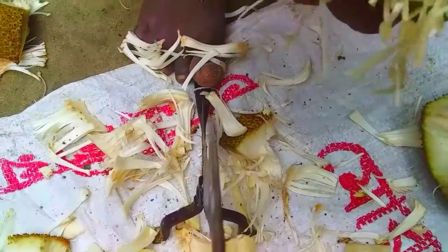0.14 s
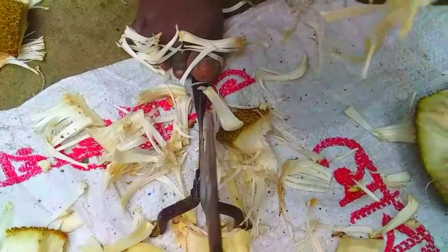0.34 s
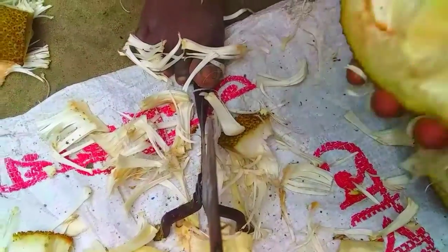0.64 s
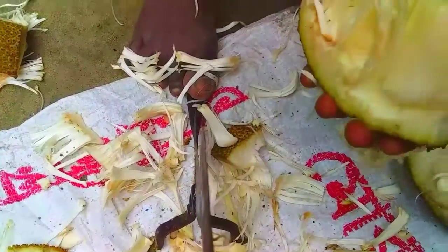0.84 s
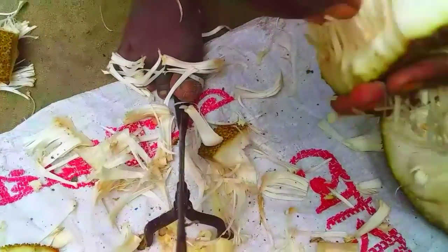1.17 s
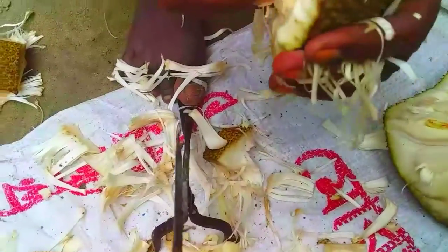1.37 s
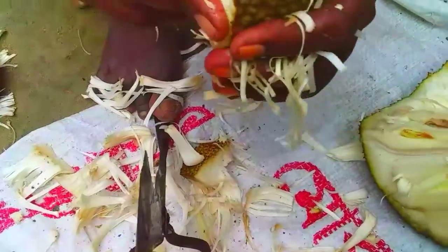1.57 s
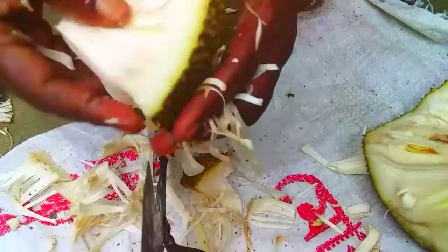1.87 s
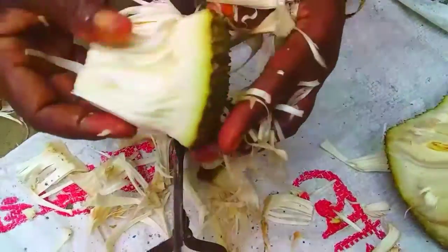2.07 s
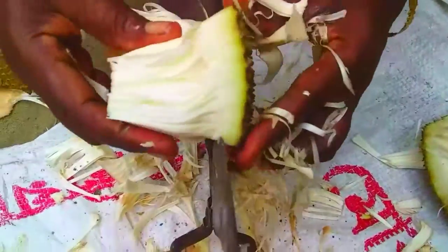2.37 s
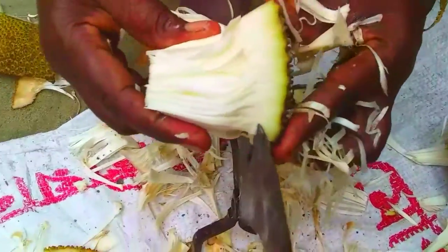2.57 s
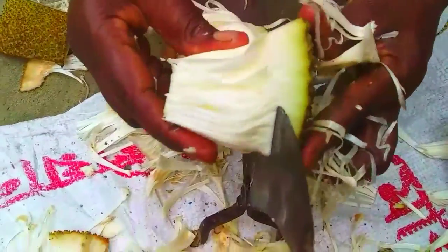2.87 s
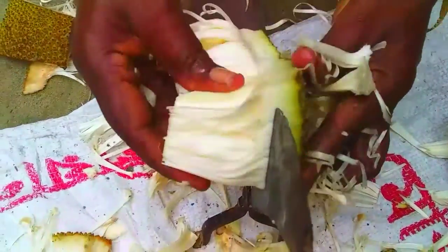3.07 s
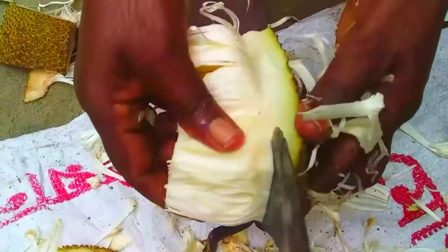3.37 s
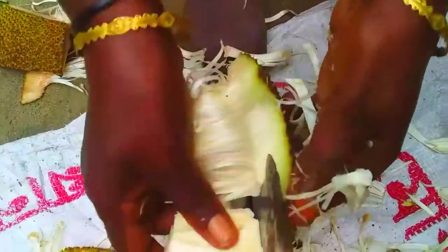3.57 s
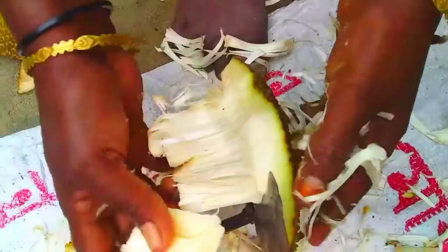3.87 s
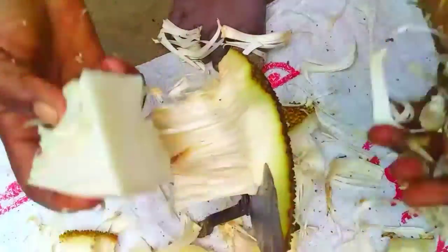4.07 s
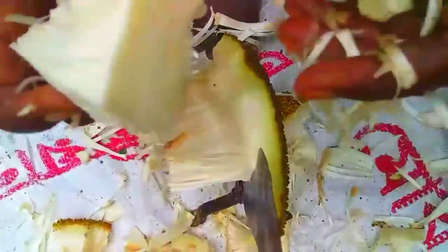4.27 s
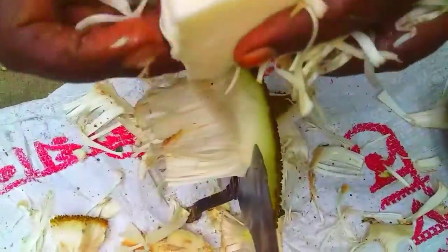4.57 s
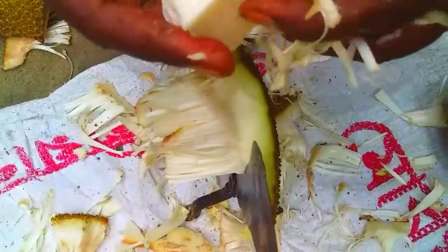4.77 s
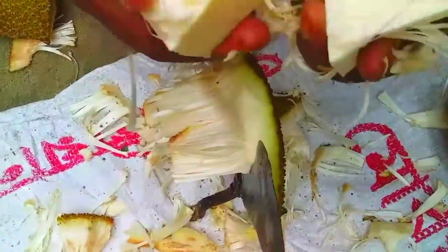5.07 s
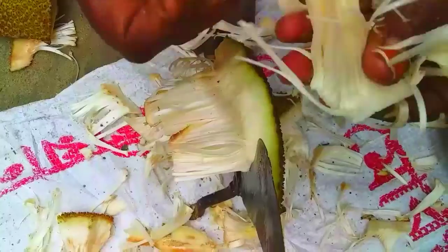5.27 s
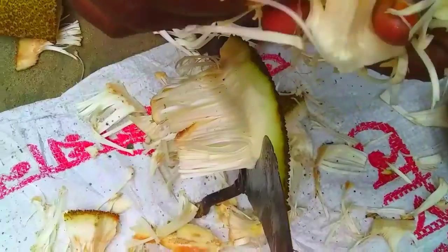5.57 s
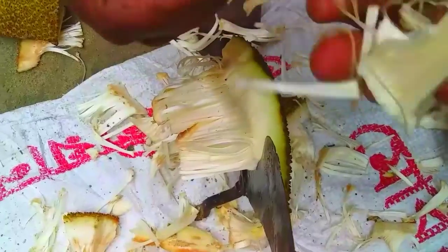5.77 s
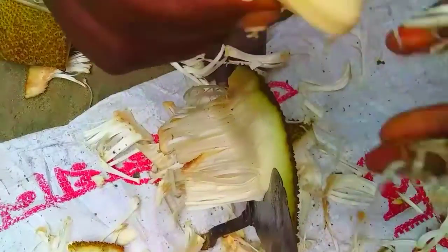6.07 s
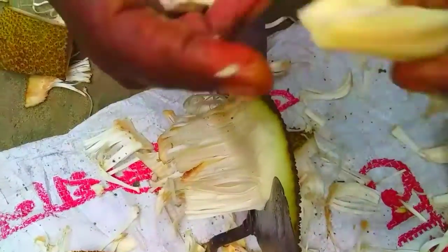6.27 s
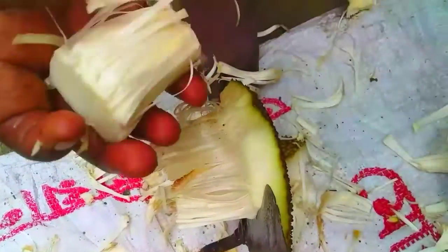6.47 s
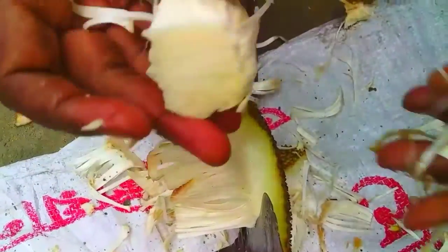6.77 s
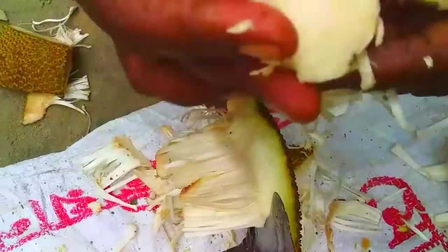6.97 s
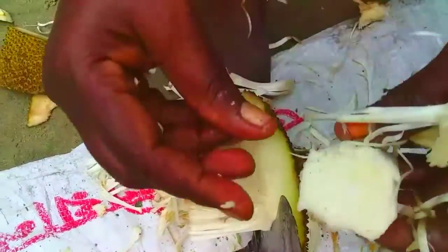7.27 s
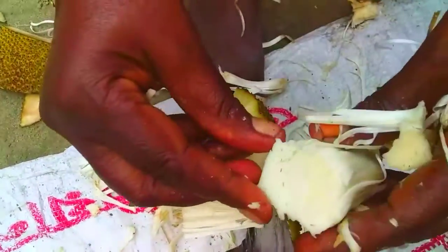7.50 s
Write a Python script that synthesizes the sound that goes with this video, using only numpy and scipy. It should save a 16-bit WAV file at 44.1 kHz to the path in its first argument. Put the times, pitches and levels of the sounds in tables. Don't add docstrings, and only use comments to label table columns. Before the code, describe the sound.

Close hands rip and snap a fibrous jackfruit on a blade while a chick peeps and a kid goat bleats once in a walled yard.

```python
import sys
import numpy as np
from scipy import signal
from scipy.fft import rfft, irfft, next_fast_len
from scipy.io import wavfile
from scipy.ndimage import uniform_filter1d

SR = 44100
rng = np.random.default_rng(int(sys.argv[2]) if len(sys.argv) > 2 else 0)


def rack_gain(trim_db):
    fader = np.asarray(trim_db, float)
    return 10 ** (fader / 20)


def materialize(psi):
    bounded = np.clip(np.atleast_2d(psi).T, -1, 1)
    quanta = np.round(bounded * 32767).astype(np.int16)
    wavfile.write(sys.argv[1], SR, quanta)


N = 336867

# start_s, peak_db
TICKS = [(0.562, -43), (0.7018, -57), (2.4773, -79), (3.2253, -30), (3.64, -42), (3.674, -48),
         (3.686, -40.5), (3.731, -48), (3.763, -41), (4.0234, -41), (4.0996, -58), (4.1428, -41),
         (4.6474, -41), (4.667, -33), (4.7027, -36), (4.835, -40), (4.947, -46), (4.8857, -25.5),
         (5.0506, -36), (5.077, -45), (5.27, -34.5), (5.439, -45), (5.482, -38), (5.5557, -48),
         (5.5867, -33), (6.0604, -34), (6.4502, -47), (6.484, -47), (6.594, -41), (6.746, -40),
         (6.868, -41), (7.0048, -37), (7.482, -35)]
SNAP_ATTACK_S = 0.0022


def rms_one(x):
    return x / np.sqrt(np.mean(x ** 2) + 1e-20)


def in_time(rows):
    s, *columns = np.transpose(rows)
    first, last = round(s[0] * SR), min(round(s[-1] * SR), N)
    t = np.arange(first, last) / SR
    return first, last, [np.interp(t, s, c) for c in columns]


def whole(rows):
    s, *columns = np.transpose(rows)
    return [np.interp(np.arange(N) / SR, s, c) for c in columns]


def drift(rate, size=N):
    r = np.exp(-2 * np.pi * rate / SR)
    noise = rng.standard_normal(size + SR // 2)
    return rms_one(signal.lfilter([1], [1, -2 * r, r * r], noise)[SR // 2:])


def coloured(x, spectrum):
    size = next_fast_len(len(x))
    hz = np.arange(size // 2 + 1) * SR / size + 1
    table_hz, table_db = np.transpose(spectrum)
    gain = rack_gain(np.interp(np.log(hz), np.log(table_hz), table_db))
    return irfft(rfft(x, size) * gain, size)[:len(x)]


def band(x, low_hz, high_hz):
    return signal.sosfilt(signal.butter(2, [low_hz, high_hz], "band", fs=SR, output="sos"), x)


def resonance(x, hz, width):
    r = np.exp(-np.pi * width / SR)
    poles = [1, -2 * r * np.cos(2 * np.pi * hz / SR), r * r]
    return signal.lfilter([(1 - r * r) / 2, 0, (r * r - 1) / 2], poles, x)


def add(out, s, piece):
    at = round(s * SR)
    out[at:at + len(piece)] += piece[:N - at]


def fade(size, rise=.3):
    return signal.windows.tukey(size, np.clip(rise, .01, 1))


def whistle(hz, db):
    return rack_gain(db) * np.sin(2 * np.pi * np.cumsum(hz) / SR)


def glide(start_hz, end_hz, length, db):
    size = round(length * SR)
    return fade(size, 0.26) * whistle(np.linspace(start_hz, end_hz, size), db)


def bleat(rows, waver_db, second_db, throat_scale, rough):
    # freq_hz, level_db
    throat = [(400, -56), (600, -34.5), (1000, -19.5), (1300, -2), (1700, -2.5), (1950, -28), (2250, -16.5),
              (2800, -6.5), (3400, -12.5), (4500, -9), (5600, -13.5), (7800, -22), (9000, -31),
              (11000, -53)]
    first, last, (hz, level_db, tilt_db) = in_time(rows)
    size = last - first
    sag = 1 - hz / hz.max()
    rough = np.clip(rough + 0.8 * sag, 0, 1)
    fray_db = 32 * np.maximum(sag - 0.1, 0)
    hz = uniform_filter1d(hz, size=600, mode="nearest")
    hz = hz * (1 + 0.00092 * drift(34, size) + 0.033 * rough * drift(127, size))
    phase = 2 * np.pi * np.cumsum(hz) / SR
    throat_hz, throat_db = np.transpose(throat)
    tone = 0
    for k in range(1, 20):
        resonance_db = np.interp(k * hz, throat_scale * throat_hz, throat_db)
        opening_db = tilt_db * max(np.log2(k / 3), 0) + second_db * (k == 2)
        breakup_db = fray_db * np.clip(k - 3, 0, 3) * (drift(150, size) / 2 - 1)
        db = resonance_db + opening_db + waver_db * drift(23.5, size) + breakup_db
        tone = tone + rack_gain(db) * np.sin(k * phase + 0.6 * k * k)
    rasp = rms_one(band(rng.standard_normal(size), 2200, 5400)) * (1 + np.cos(phase))
    out = np.zeros(N)
    out[first:last] = rack_gain(level_db) * fade(size, 0.077) * (tone + 0.3 * rough * rasp)
    return out


def near_goat():
    # start_s, pitch_hz, level_db, mouth_opening_db_per_octave
    rows = [
        (1.13, 602, -51, -22),
        (1.215, 570, -42.5, -15),
        (1.24, 565, -39.5, -4),
        (1.38, 563.7, -37, -3),
        (1.6, 553.4, -35.5, -6),
        (1.665, 546, -40, 1),
        (1.71, 497, -30, -8),
        (1.75, 440, -33, -12),
        (1.78, 385, -65, -13),
    ]
    return bleat(rows, waver_db=3.0, second_db=-3.5, throat_scale=0.98, rough=0.067)


def answering_goat():
    # start_s, pitch_hz, level_db, mouth_opening_db_per_octave
    rows = [
        (4.345, 562, -67, 2),
        (4.4, 575, -58, 1),
        (4.5, 588, -55.5, -1),
        (4.6, 596, -52.5, -2.5),
        (4.73, 608, -55, -2),
        (4.75, 610, -75, 0),
    ]
    return bleat(rows, waver_db=2.5, second_db=-7, throat_scale=1.017, rough=0.2)


def far_goats():
    # start_s, pitch_hz, length_s, level_db, third_multiple_against_second_db
    throbs = [
        (1.804, 304, 0.062, -61, -24),
        (1.913, 326, 0.058, -64.5, -10),
        (2.029, 328, 0.06, -62.5, -15),
        (5.624, 293.3, 0.059, -82, 14),
        (5.744, 315.3, 0.08, -71.5, 10.5),
        (5.859, 320, 0.075, -72.5, 13),
        (5.969, 320.4, 0.082, -68.5, 9.5),
    ]
    # start_s, pitch_hz, level_db
    squeal = [
        (5.33, 1410, -84),
        (5.45, 1425, -77),
        (5.6, 1420, -77),
        (5.72, 1410, -86),
    ]
    out = np.zeros(N)
    for s, hz, length, db, third_db in throbs:
        t = np.arange(round(length * SR)) / SR
        hoarseness = .07 if third_db < 0 else .02
        phase = 2 * np.pi * hz * (t + hoarseness * np.cumsum(drift(35, len(t))) / SR)
        upper = rack_gain(-4 + 5.9 * drift(70, len(t))) * np.sin(3 * phase)
        upper += rack_gain(-6.5) * np.sin(5 * phase / 2)
        upper += rack_gain(-12) * np.sin(6 * phase) + np.sin(9 * phase)
        voice = np.sin(2 * phase) + rack_gain(third_db) * upper
        add(out, s, rack_gain(db) * fade(len(t), 0.67) * voice)
    first, last, (hz, db) = in_time(squeal)
    phase = 2 * np.pi * np.cumsum(hz * (1 + 0.05 * drift(82, len(hz)))) / SR
    waver_db = 3 * drift(11, len(hz))
    out[first:last] += rack_gain(db + waver_db) * (np.sin(phase) + rack_gain(15.0) * np.sin(2 * phase))
    return out


def crackle(per_s, spread_db, clump_db=5):
    sizes = rack_gain(spread_db * np.minimum(rng.exponential(1, N), 4)) * rng.choice([-1, 1], N)
    return sizes * (rng.random(N) < per_s * rack_gain(clump_db * drift(60)) / SR)


def split(x, at_hz=2600):
    # freq_hz, level_db_per_hz
    fibre = [(240, -69), (400, -43), (665, -12.5), (837, -17), (1650, -12.5), (2780, -6.5), (4480, 0),
             (5310, -4), (7330, 4), (8420, 1), (9530, -16.5), (12800, -15), (15800, -12)]
    x = coloured(x, fibre)
    x = x + 1.2 * resonance(x, hz=1520, width=450)
    low = signal.sosfilt(signal.butter(2, at_hz, fs=SR, output="sos"), x)
    return low / np.std(band(x, 900, 2000)), (x - low) / np.std(band(x, 6200, 9000))


def ripping():
    # peak_s, build_up_s, die_away_s, level_db at 6-9 kHz, lows_against_it_db
    rips = [(0.21, 0.032, 0.028, -58, -3.5), (1.41, 0.058, 0.046, -61, 0), (1.7, .05, 0.14, -59.5, -12),
            (1.821, 0.07, 0.087, -58, -0.5), (2.735, 0.024, 0.063, -55, -4.5),
            (2.84, 0.038, 0.065, -62.5, -5), (2.973, 0.036, 0.027, -49, -5.5),
            (3.02, 0.018, 0.023, -67.5, -2), (3.215, .006, .008, -56, -4), (3.251, 0.028, 0.03, -46, -6.5),
            (3.54, 0.0076, 0.022, -46.5, -5), (3.552, 0.0071, .01, -54, -4),
            (3.573, 0.013, 0.0093, -36.5, -3), (3.602, 0.024, 0.027, -36.5, -7),
            (3.645, .01, 0.016, -64, -14), (3.83, 0.045, 0.073, -64.5, -4), (4.09, 0.067, 0.095, -61, -13),
            (4.44, 0.049, 0.12, -71, 10.5), (4.812, 0.025, 0.024, -48, -5.5),
            (4.885, 0.019, 0.037, -51.5, -3), (5.589, 0.017, 0.034, -52, -28),
            (5.88, 0.075, 0.1, -57, -10.5), (6.08, 0.022, 0.018, -56, -3), (6.1, 0.051, 0.061, -61, 6.5),
            (6.18, .05, 0.059, -64, 7.5), (6.26, 0.032, 0.064, -70.5, 7), (6.603, 0.0062, 0.024, -53.5, -3),
            (6.7, 0.027, 0.052, -59.5, -12), (7.15, 0.032, 0.089, -69.5, 7),
            (7.49, 0.015, 0.094, -55.5, -28), (7.506, 0.0032, 0.0051, -64, -4),
            (7.57, 0.053, 0.053, -57, -1)]
    low, high = split(crackle(9000, 2.8, clump_db=2.5))
    out = np.zeros(N)
    for s, rise, fall, db, low_db in rips:
        first, last, (away,) = in_time([(s - 1.5 * rise, 1.5), (s, 0), (s + 1.5 * fall, 1.5)])
        pull_db = db - 12 * away ** 4
        out[first:last] += rack_gain(pull_db) * (high[first:last] + rack_gain(low_db) * low[first:last])
    return out


def snaps():
    # start_s, peak_db, lows_against_it_db, t60_s
    thick = [(0.104, -37.5, 2.5, 0.014), (0.391, -42, 6, 0.013), (6.603, -37.5, 5.5, 0.015),
             (6.077, -26.5, -21, 0.01), (4.7623, -26, -13, 0.015), (0.122, -39, -1.5, 0.037),
             (0.2006, -42, -1, 0.018), (0.214, -30.5, -0.5, 0.025), (1.051, -33, -4, 0.043),
             (1.076, -39.5, 2, 0.07), (2.9382, -38, -7, 0.032), (3.123, -39.5, -3, 0.015),
             (3.179, -39.5, -15, 0.017), (3.537, -26, -1.5, 0.015), (3.5612, -25, 4, 0.013),
             (3.5684, -18, -1, 0.014), (3.5795, -22, -1, 0.0089), (3.5919, -15, -1, 0.021),
             (3.597, -15, 0.5, 0.013), (3.6065, -19, -3, .01), (3.6135, -29, -3, .01),
             (1.792, -31.5, 4, 0.011), (3.8444, -39.5, -4, 0.019), (4.475, -34, -5.5, 0.019),
             (4.569, -52, -6, 0.012), (4.7242, -40, -8, 0.044), (4.7406, -20, -16, 0.035),
             (4.8088, -21.5, -19, 0.019), (4.8, -36, -10, 0.011), (4.87, -42, -8, 0.011),
             (4.897, -29, -4, 0.014), (4.9298, -28.5, -32, 0.026), (5.0209, -32.5, -24, 0.037),
             (5.241, -40.5, -6, 0.045), (7.0938, -34.5, 4, 0.0091), (7.16, -40, 5.5, 0.018)]
    thin = [(s, db, -33, 0.019) for s, db in TICKS]
    low, high = split(rng.standard_normal(N))
    out = np.zeros(N)
    for s, db, low_db, t60 in list(thick) + thin:
        at = round(s * SR)
        burst = high[at:at + 1500] + rack_gain(low_db) * low[at:at + 1500]
        t = np.arange(len(burst)) / SR
        decay = rack_gain(db - 7.0 - 60 * t / np.clip(t60, .003, .2))
        add(out, s, decay * np.minimum(t / SNAP_ATTACK_S, 1) * burst)
    return out


def taps():
    # start_s, peak_db, ring_hz
    knocks = [(0.39, -51, 1420), (1.05, -39, 763), (3.536, -38, 617), (3.537, -30.5, 198),
              (3.593, -28.5, 653), (4.743, -39.5, 1135), (4.929, -41.5, 953), (5.322, -46.5, 1126),
              (5.323, -50, 615), (6.06, -42, 1240), (6.603, -59, 1450), (7.155, -44, 680),
              (7.559, -45.5, 1520)]
    modes = [(0.97, -2.0, 0.026), (0.59, -14, 0.014), (0.64, -25.0, 0.21)]   # ratio, level_db, t60_s
    out, t = np.zeros(N), np.arange(3000) / SR
    for s, db, hz in knocks:
        for ratio, mode_db, t60 in modes:
            add(out, s, rack_gain(db + mode_db - 60 * t / t60) * np.sin(2 * np.pi * ratio * hz * t))
    return out


def sparks():
    # start_s, peak_db
    threads = [(0.1999, -54), (0.2154, -52), (1.0495, -58), (1.077, -61), (1.6327, -56), (1.734, -58),
               (2.7167, -54), (2.9397, -47), (3.1223, -59), (3.2116, -52), (3.2256, -46), (3.5349, -53),
               (3.5633, -45), (3.5633, -43), (3.5962, -37), (3.6576, -48), (3.7309, -50), (3.7474, -46),
               (4.0218, -60), (4.4722, -48), (4.6458, -51), (4.6593, -50), (4.6768, -36), (4.7022, -41),
               (4.7227, -42), (4.7411, -27.5), (4.7805, -40), (4.8005, -36), (4.809, -33), (4.8678, -44),
               (4.9282, -39), (5.0205, -36), (5.0779, -50), (5.1771, -58), (5.2619, -45), (5.439, -57),
               (5.461, -50), (5.5792, -55), (6.0616, -56), (6.4667, -51), (6.5934, -62), (6.8688, -50),
               (7.007, -56), (7.4814, -61), (7.5038, -51)]
    out, t = np.zeros(N), np.arange(600) / SR
    hiss = rms_one(band(rng.standard_normal(N + 600), 8500, 16000))
    for s, db in threads:
        at = round(s * SR)
        decay = rack_gain(db - 2 - 60 * t / 0.02)
        add(out, s, decay * np.minimum(t / SNAP_ATTACK_S, 1) * hiss[at:at + len(t)])
    return out


def chick():
    # start_s, top_hz, level_db, falling_end_db, echo_db
    calls = [
        (0.423, 3283, -31.5, -4, -6),
        (.756, 3342, -31, -4, -7.5),
        (1.1, 3323, -34, -4.5, 1),
        (2.568, 3257, -39, -3.5, -0.5),
        (3.111, 3418, -42, -3, 5),
        (3.434, 3367, -33, -5.5, -2.5),
        (3.789, 3276, -39.5, -1.5, 1.5),
        (4.131, 3350, -31.5, -3, -8.5),
        (4.463, 3335, -30, -0.5, -8),
        (4.811, 3327, -29, -1, -8.5),
    ]
    top_s, rise_s, fall_s = .0145, .037, .054
    direct, sent = np.zeros(N), np.zeros(N)
    t = np.arange(-rise_s, fall_s, 1 / SR)
    before, after = np.maximum(-t, 0), np.maximum(t, 0)
    share = 1 - (before / .05) ** 2.4 - (after / .1) ** 1.9
    shape_db = -28 * (before / rise_s) ** 2.0 - 197 * after
    for mark, top_hz, db, end_db, echo_db in calls:
        falling_db = end_db * np.clip((t - .004) / 0.019, 0, 2.3)
        flutter_db = 2.5 * drift(110, len(t))
        cut_db = -3000 * np.maximum(t - .049 - .001 * end_db, 0)
        level_db = db + shape_db + falling_db + flutter_db + cut_db
        peep = fade(len(t), 0.15) * whistle(top_hz * share, level_db)
        add(direct, mark + top_s - rise_s, peep)
        add(sent, mark + top_s - rise_s, rack_gain(echo_db) * peep)
    return direct, sent


def sparrow_tumble():
    # start_s, pitch_hz, level_db
    tumble = [
        (.134, 6260, -43.5),
        (.148, 5250, -35),
        (.155, 3970, -33.5),
        (.162, 2935, -37),
        (.172, 2720, -44),
        (.186, 2650, -51),
        (.196, 2600, -70),
    ]
    out = np.zeros(N)
    first, last, (hz, db) = in_time(tumble)
    hz = uniform_filter1d(hz, size=120, mode="nearest")
    out[first:last] = whistle(hz, db + 3.75 * drift(250, len(hz)))
    return out


def sparrows():
    # start_s, level_db, echo_db
    drops = [
        (6.02, -47.5, -1),
        (6.32, -39, 0.5),
        (6.615, -41.5, 0),
        (7.09, -40.5, -2.5),
        (7.391, -40, -2),
    ]
    # start_s, start_hz, end_hz, length_s, level_db
    across = [
        (0.718, 2100, 1900, 0.02, -62),
        (0.994, 6600, 5150, 0.012, -53),
        (2.502, 2000, 2290, 0.047, -63),
        (3.08, 1950, 2150, 0.02, -62),
        (3.128, 3500, 4100, 0.028, -58),
        (3.317, 6500, 5130, 0.019, -59),
        (4.089, 2300, 1890, .025, -57),
        (4.143, 4800, 5080, 0.02, -51),
        (5.4, 2500, 3300, 0.095, -64),
        (6.37, 5430, 5300, 0.055, -66),
    ]
    close = [
        (.231, 2780, 1620, 0.036, -55.5),
        (0.706, 3190, 1990, 0.0136, -65),
        (4.015, 4150, 2930, 0.03, -54),
        (5.223, 4170, 3150, 0.018, -54.5),
    ]
    direct = sparrow_tumble()
    sent = direct.copy()
    length_s, peak_s = .038, .0095
    t = np.arange(0, length_s, 1 / SR)
    hz = 3150 - 34000 * t + 2070 * np.exp(-t / .0045)
    swell_db = -21 * (1 - t / peak_s) ** 2
    fall_db = -18 * ((t - peak_s) / (length_s - peak_s)) ** 2
    shape_db = np.where(t < peak_s, swell_db, fall_db)
    for s, db, echo_db in drops:
        stroke = fade(len(t), 0.062) * whistle(hz, db + shape_db + 4.5 * drift(186, len(t)))
        add(direct, s, stroke)
        add(direct, s + .009, rack_gain(-16) * stroke)
        catch_s = 0.0038
        add(direct, s - catch_s, glide(3170, 3170, catch_s, db - 8.5))
        add(sent, s, rack_gain(echo_db) * stroke)
    for chips, direct_db in [(across, -11), (close, 4)]:
        for s, start_hz, end_hz, length, db in chips:
            chip = glide(start_hz, end_hz, length, db)
            add(direct, s, rack_gain(direct_db) * chip)
            add(sent, s, chip)
    return direct, sent


def yard(x, t60, gap_s):
    t = np.arange(SR) / SR
    decay = rack_gain(-60 * t / t60) + rack_gain(-13 - 60 * t / 0.75)
    echoes = rng.standard_normal(SR) * decay * np.clip(t / gap_s, 0, 1) ** 2
    return signal.fftconvolve(x, echoes / np.sqrt(np.sum(echoes ** 2)))[:N]


def far_birds():
    # start_s, start_hz, end_hz, length_s, level_db
    calls = [
        (0.001, 5190, 1796, 0.012, -57),
        (1.824, 2383, 4950, 0.022, -45),
        (1.926, 2620, 4420, 0.022, -50),
        (2.153, 2250, 4850, 0.044, -47.5),
        (3.348, 2370, 4980, 0.035, -50.5),
        (3.745, 2595, 4890, 0.039, -43),
    ]
    out = np.zeros(N)
    for s, start_hz, end_hz, length, db in calls:
        add(out, s, glide(start_hz, end_hz, length, db))
    return yard(out, t60=0.63, gap_s=0.044)


def rustle():
    # start_s, level_db
    busy = [(0, -64.5), (.85, -66.5), (1.05, -69), (1.6, -60), (2.0, -66.5), (2.5, -66.5), (2.8, -64.5),
            (3.45, -69.5), (3.7, -64), (3.95, -65.5), (4.4, -62), (4.75, -59.5), (5.25, -62.5),
            (5.8, -63.5), (6.2, -62.5), (6.65, -61), (7.35, -63), (7.64, -66)]
    # start_s, level_db
    leaves = [(0, -57.5), (.4, -63.5), (.6, -89), (2.5, -73.5), (2.8, -73), (3.9, -74), (4.5, -57.5),
              (5.2, -65), (5.9, -63.5), (6.5, -63), (7.64, -65)]
    (fizz_db,), (leaf_db,) = whole(busy), whole(leaves)
    s = np.arange(N) / SR
    near_tick = sum(np.clip(1 - np.abs(s - tick) / 0.29, 0, 1) for tick, _ in TICKS)
    top_db = -77 + 3.1 * (fizz_db + 60.5) + 8 * near_tick
    low_db = -73 + 0.26 * (leaf_db + 55)
    shreds = split(crackle(14000, 3.3))[1]
    out = rms_one(band(shreds, 6670, 9900)) * rack_gain(fizz_db - 2.5 + 0.5 * drift(7.6))
    out += rms_one(band(crackle(12000, 2.0), 7200, 21000)) * rack_gain(top_db - 18.0 + 1.2 * drift(6.6))
    out += rms_one(band(rng.standard_normal(N), 2520, 5730)) * rack_gain(leaf_db)
    return out + rms_one(band(rng.standard_normal(N), 450, 2800)) * rack_gain(low_db)


def humming(hz, width):
    return rms_one(resonance(resonance(rng.standard_normal(N), hz, width), hz, width))


def background():
    # freq_hz, level_db_per_hz
    air_colour = [(18, -46), (30, -27), (59, -4.5), (98, 5), (294, -13), (471, -27), (839, -33),
                  (1700, -31), (3280, -24.5), (3940, -31), (5540, -28), (7800, -29.5), (8660, -28),
                  (9620, -48.5), (15800, -32)]
    # start_s, level_db
    load = [(0.0, -71), (0.7, -73), (1.3, -68.5), (2.4, -67.5), (3.2, -65), (3.95, -73), (4.42, -60.5),
            (4.9, -66.5), (5.4, -67), (5.8, -62), (6.15, -55), (6.5, -57.5), (7, -55.5), (7.64, -56.5)]
    # freq_hz, width_hz, level_db
    modes = [
        (132.6, 59, -1.5),
        (205.6, 29, -3.5),
        (275.6, 116, -4.5),
        (393.7, 22.6, -12.5),
        (469, 153, -13.5),
    ]
    air = rack_gain(-57.5) * rms_one(coloured(rng.standard_normal(N), air_colour))
    drone = rack_gain(-60.5) * humming(76.0, 20)
    rumble = sum(rack_gain(db + 1.5 * drift(3.46)) * humming(hz, width) for hz, width, db in modes)
    return air + drone + rack_gain(whole(load)[0] - 3.0) * rumble


def scene():
    goat, answer, far = near_goat(), answering_goat(), far_goats()
    hands = ripping() + snaps() + taps() + sparks()
    (peeps, peeps_sent), (chips, chips_sent) = chick(), sparrows()
    sent = rack_gain(-10) * goat + rack_gain(-5) * answer + rack_gain(-5) * far
    sent = sent + peeps_sent + chips_sent + rack_gain(-15.5) * hands
    dry = goat + answer + far + rack_gain(-4.5) * peeps + chips + hands + rustle() + background()
    return (dry + yard(sent, t60=0.3, gap_s=0.007) + far_birds())[None, :]


def band_limit(x):
    return signal.sosfilt(signal.butter(12, 15980, fs=SR, output="sos"), x)


def record(dry):
    dry = signal.sosfilt(signal.butter(2, 42, "high", fs=SR, output="sos"), dry)
    dry = signal.sosfilt(signal.cheby2(14, 70, 16150, fs=SR, output="sos"), dry)
    return band_limit(dry)


dry = scene()
out = record(dry)
materialize(out)
```